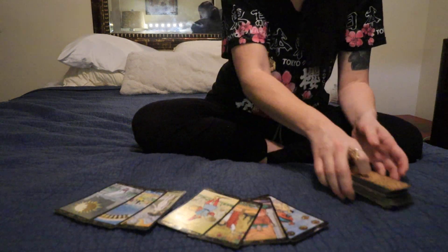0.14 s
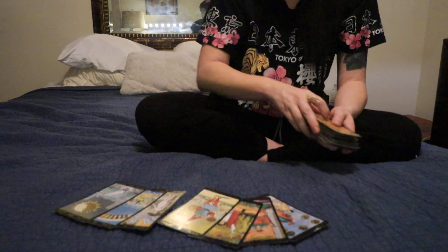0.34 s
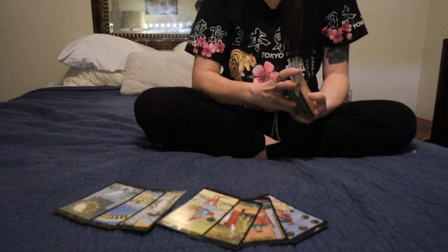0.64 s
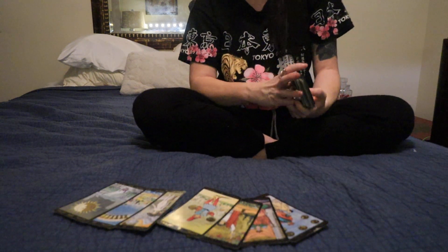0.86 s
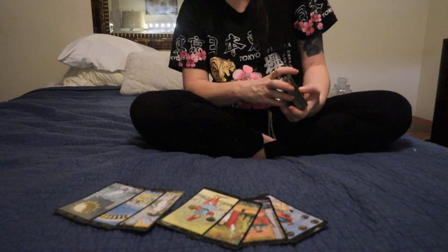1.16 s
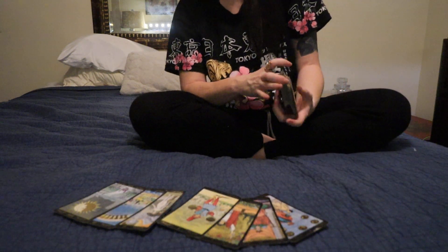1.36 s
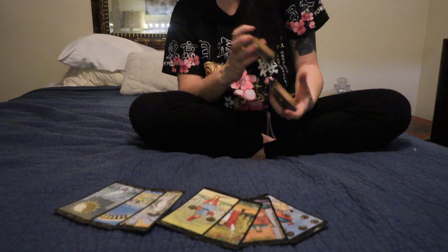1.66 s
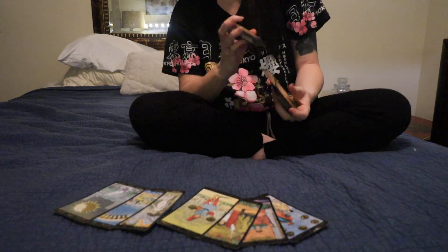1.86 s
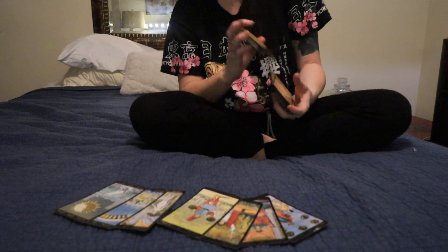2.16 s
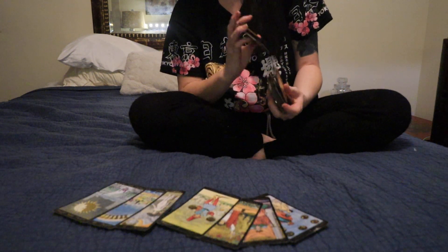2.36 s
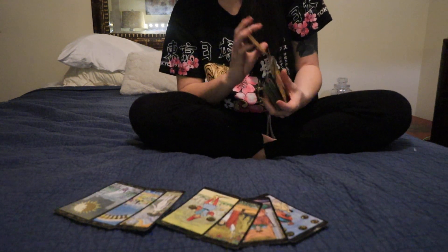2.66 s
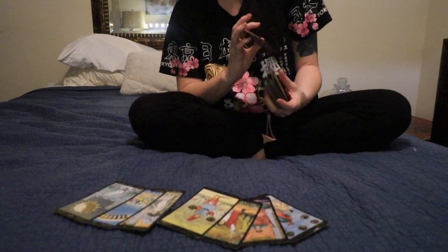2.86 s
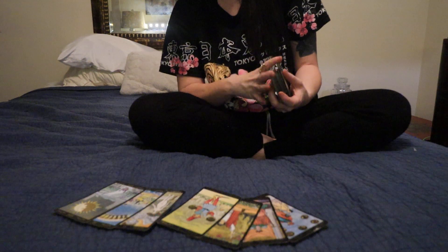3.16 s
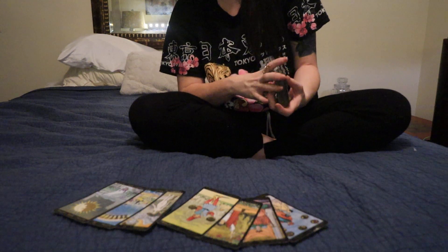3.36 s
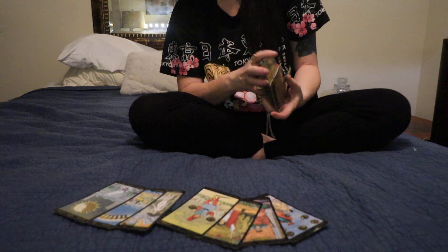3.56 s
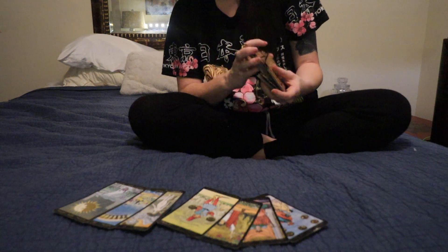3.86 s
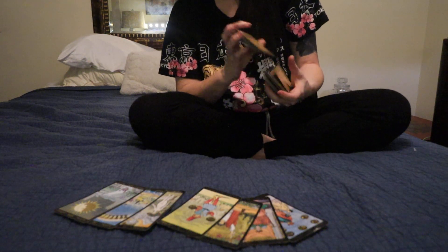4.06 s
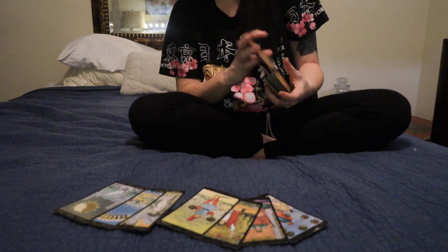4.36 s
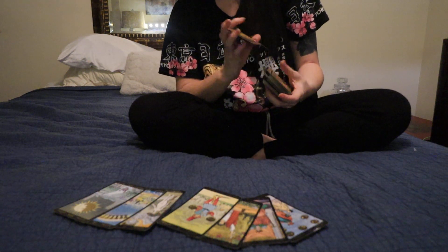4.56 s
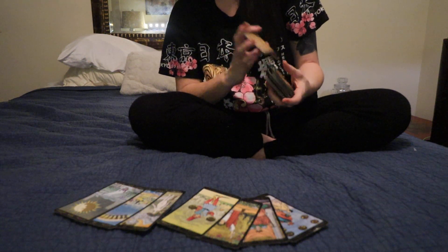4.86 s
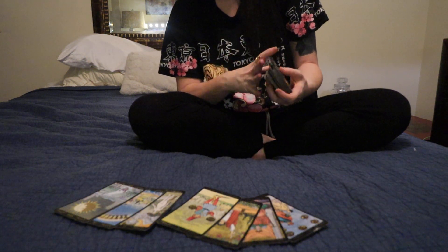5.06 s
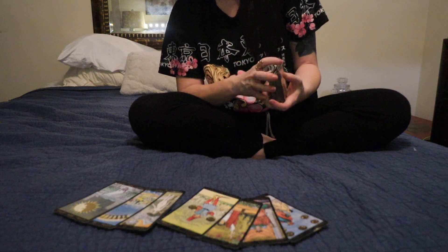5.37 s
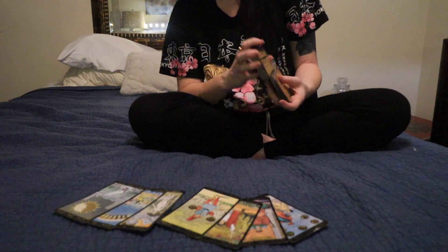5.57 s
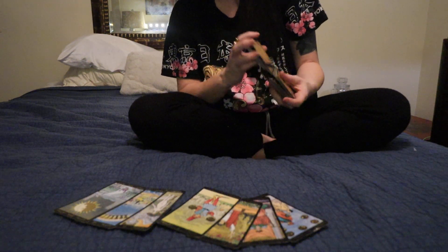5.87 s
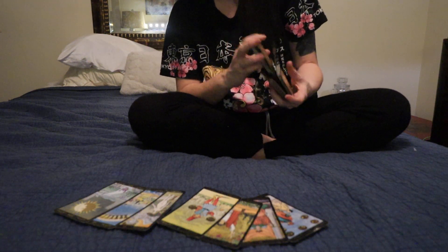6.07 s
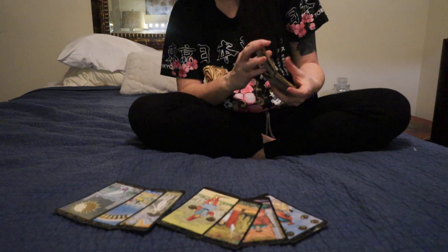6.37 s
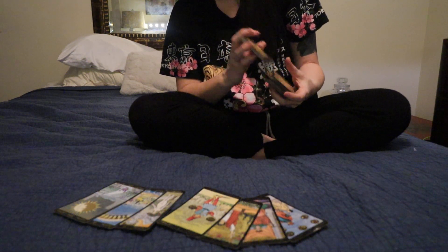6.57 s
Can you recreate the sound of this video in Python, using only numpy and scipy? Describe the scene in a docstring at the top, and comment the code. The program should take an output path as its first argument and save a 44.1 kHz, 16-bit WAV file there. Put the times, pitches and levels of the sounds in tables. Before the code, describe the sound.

In a small bedroom, over faint low mains hum, soft hiss and ventilation, a deck of cards is handled and shuffled. From 0 to 0.8 s, light uneven ticks and papery scrapes accompany picking up the pack, with one sharper click near 0.24 s and soft lumpy mattress thumps until about 0.55 s. It is nearly quiet until 1.5 s. At 1.56 s a crisp slap starts the shuffle; dense snaps and slides follow from 1.8 to 3.1 s, strongest near 2.05 s. After a lull, clicks resume at 3.65 s and run to 5.1 s, with bright cracks near 4.47, 4.72 and 5.0 s. Another gap, then from 5.7 s quick slaps and rubbing build to the loudest snaps at 6.43 and 6.69 s. Faint dull palm pats underlie some hits. Short room decay with slight wall flutter; both channels alike.

```python
"""Overhand card shuffle in a bedroom

Packets of cards snap and slap onto the pack: short noise rattles through four groups of resonances.
Faces slide on faces and edges scrape and tick: coloured noise swelling and fading with each stroke.
The pack lands in the palm with damped low sines; the mattress gives lumpy low noise early on.
A small room answers contacts and slides with decaying noise, over mains hum, hiss and ventilation.
The two channels are alike."""
import sys
import numpy as np
from scipy import signal
from scipy.fft import rfft, irfft, next_fast_len
from scipy.io import wavfile
from scipy.ndimage import uniform_filter1d, map_coordinates

SR = 44100
rng = np.random.default_rng(int(sys.argv[2]) if len(sys.argv) > 2 else 0)


def wav_record(signal):
    """Record a signal, one row per channel, as 16-bit PCM in the file named by sys.argv[1]."""
    frames = np.transpose(np.atleast_2d(signal))
    bounded = np.clip(frames, -1, 1)
    # unit amplitude maps onto the largest positive 16-bit level
    quanta = np.round(bounded * 32767).astype(np.int16)
    wavfile.write(sys.argv[1], SR, quanta)


N = 296352

# Card contacts. Each row: start in seconds, base level in dB, hollow slap over it in dB,
# tilt in dB (edge up and flap down by this much), corner snap over the base in dB,
# rattle duration in seconds, own ring in Hz, own ring level in dB.
CONTACTS = [(0.036, -29, 0, 4.5, 1, 0.0032, 593, 4), (0.063, -35, 11, 7, -5, 0.0025, 1350, 7),
            (0.099, -31.0, 5.5, -2.5, -9, 0.0016, 1080, 14.5), (0.168, -28, 9, 4, -5, 0.002, 1260, 11),
            (0.198, -28, 6, 9, -1.0, 0.0041, 1200, 13), (0.209, -32, 10, 2, -4.0, 0.0074, 1400, 8),
            (0.243, -13.5, -6.5, 1.5, -3.5, 0.0005, 834, 13.5), (0.266, -33, 3, -8, -11, 0.0023, 1430, 6),
            (0.2792, -28.5, 8, 5, -3, 0.0048, 2800, 13), (0.373, -38, 7, 8, -7, 0.0047, 980, 1),
            (0.393, -21, -7, 7.5, -9, 0.0078, 1020, 12), (0.443, -36, -11.5, 1.5, 6, 0.0034, 1750, 13),
            (0.47, -21.5, -24, 1.5, -4, 0.014, 2020, 7), (0.487, -29, -15, -4, -2, 0.004, 2500, 6),
            (0.5106, -36, 1, -7, -5, 0.005, 300, 3), (0.54, -37, 8, -6, -8, 0.0019, 300, 3),
            (0.576, -39, 7, 5, -4, 0.0019, 6590, 11), (0.6015, -30, -4.5, 4.5, 3.5, 0.0035, 2870, 7),
            (0.685, -37.5, -8, 12.5, -4, 0.0055, 7400, 5), (0.725, -26.5, -16, 3.5, -1, 0.0064, 870, 9),
            (0.782, -36, 6.5, -1, 1.5, 0.003, 6410, 6), (0.793, -39.5, 14.5, 4, 6, 0.0046, 6410, 8),
            (1.029, -35, -4, 2, -1, 0.0028, 640, 9), (1.512, -35.5, -4, 3, -4, 0.002, 1750, 5),
            (1.562, -12.5, 2.5, -1.5, 6, 0.0019, 690, 4.0), (1.574, -18, -4, 0, -14, 0.004, 2020, 5.0),
            (1.795, -14.0, -2, 0.5, 1, 0.0063, 1630, 12.5), (1.828, -16, -8.0, -1.5, -3.0, 0.0077, 390, 10),
            (1.886, -14.5, -3, -1.5, -3, 0.0056, 1090, 9), (1.895, -15.5, -0.5, 0.5, -3, 0.0028, 6800, 1),
            (2.05, -8, 0.5, 2.5, -4.5, 0.0054, 1080, 6.0), (2.152, -23, -25, 8, -4, 0.016, 1560, 14),
            (2.169, -13.0, 5.0, 1.5, -2.5, 0.0058, 1440, 8), (2.302, -27, 2, 2.5, -10, 0.0056, 1350, 9),
            (2.352, -30.5, 3, 1, -1, 0.004, 5230, 7), (2.3884, -28.5, -5, 8.5, 2.5, 0.0037, 2640, 17),
            (2.496, -27.5, -8, -1.5, -1, 0.0032, 6050, 4), (2.554, -24, -5.5, 3, 4, 0.0076, 870, 12),
            (2.5653, -16.0, -18, 4, 4, 0.0062, 6590, -1), (2.6124, -22.5, 0, 0, 4.5, 0.0064, 1060, 7.5),
            (2.8034, -18, 1, 1.5, 4.5, 0.0021, 1600, 8.0), (2.878, -33, 1, 0, -3.5, 0.0037, 555, 11),
            (2.885, -24, -11.0, -1.5, -5, 0.0032, 1310, 1.0), (2.927, -31.5, 5.5, -8, 3, 0.0059, 1020, 12),
            (3.028, -21, -1.5, 6, -0.5, 0.018, 2150, 19), (3.057, -28, -11, 5, 10, 0.0055, 6550, 6),
            (3.655, -31, -1, -8.5, 6, 0.0019, 2660, 4), (3.7, -21.5, 8, 3.5, -5, 0.0098, 1330, 9.5),
            (3.722, -30, -18.5, 1.0, 9, 0.0013, 1310, 1), (3.9055, -28.5, 3.5, 6.5, -4, 0.0028, 2400, 8.0),
            (3.9184, -19, -7, 0.5, -5, 0.011, 690, 2), (3.9497, -18.5, -1, 1, -1, 0.0044, 1190, 3),
            (4.016, -21, -15.0, 0, -7, 0.0068, 1560, 11.5), (4.0384, -23, 6, -3.0, -4.5, 0.0078, 1040, 6),
            (4.093, -38, -8, 14.5, 0.0, 0.0021, 1200, 11), (4.177, -19.5, -5, -1.5, -4.5, 0.0046, 3700, 0),
            (4.2456, -24.5, -3, 1, -7, 0.0049, 368, -1), (4.336, -19.5, -18, -1, -4, 0.003, 3260, -7),
            (4.345, -18, -5.5, 0.5, -4, 0.0033, 440, 5.5), (4.4522, -15, -11, 1.5, -4, 0.0033, 2080, 8.0),
            (4.473, -9, -16, 1, 6, 0.0018, 8480, 19), (4.716, -10.5, -6, 2.5, -2, 0.0013, 1080, 2),
            (4.759, -18.5, -4, 0.5, -4, 0.0068, 450, 4), (4.825, -26, -19.5, 3, -3.5, 0.0032, 1230, -2),
            (4.8463, -26.5, 6, -5.5, 5.5, 0.0073, 2140, 3),
            (4.9866, -19.5, -0.5, 0.5, -2.0, 0.0038, 3810, 6.0),
            (4.9908, -16, -5, 1.5, -3, 0.0097, 5300, 11), (5.0098, -11.5, 1, 6, 5.5, 0.0012, 1730, 3),
            (5.051, -25.5, 3, 3, 3, 0.005, 480, 1.5), (5.0984, -29, 4.5, 3, 11.5, 0.013, 1190, 11.0),
            (5.686, -22, 2, 4.5, -6, 0.0038, 4420, -3), (5.715, -26.5, -11, 10, 4, 0.0035, 1510, 17),
            (5.727, -33.5, 20.5, -1, -3.5, 0.002, 1270, 21),
            (5.878, -14.5, -10, 0.5, -1.5, 0.0033, 1300, 9), (5.921, -19, -2, 0, -3, 0.0051, 1430, 15),
            (5.9342, -22.5, 4.5, 6.5, 3.5, 0.0041, 2140, 10.0),
            (5.942, -20.5, -7.5, 4.5, 0.5, 0.0023, 820, 9), (5.948, -27.5, 5, -14.5, -8.0, 0.0013, 3560, 8),
            (6.016, -24, 4.5, 2, -6, 0.0042, 2120, 11.5), (6.128, -22.5, -9, -0.5, -4, 0.0017, 2140, 5),
            (6.141, -25, -3, 0, 4.5, 0.0017, 2620, 0), (6.156, -16.5, -8, 0, -4, 0.011, 2170, 7),
            (6.1694, -23.5, -4.0, -14.5, -1.0, 0.004, 1553, 3), (6.2, -24, 6, 4.5, 2, 0.0028, 734, 4.0),
            (6.294, -20, -6, 1.5, -6, 0.01, 950, 14), (6.3354, -33, 11, 8, 0.5, 0.0016, 410, -1),
            (6.424, -14, -13, -2, -2, 0.0024, 730, 10), (6.432, -5.5, -14, -0.5, -6, 0.0037, 2330, 10),
            (6.4393, -4.5, -12, -1, 3.5, 0.0046, 1540, 8.5), (6.511, -12.0, -9, -1, 1.5, 0.0028, 2600, 8),
            (6.522, -12.5, 3, -1, 2, 0.0013, 7200, 7), (6.662, -36, 1, 3.0, 1.5, 0.0023, 3920, 4),
            (6.686, 0.5, -12.5, 0, 3.5, 0.0015, 3050, 8.5)]
# Resonances, before their skirts are steepened. Each row: centre in Hz, width in Hz, level in dB.
HOLLOW_MODES = [(356, 514, 8.5), (468, 98, -7), (690, 800, 3)]  # air squeezed between packets
FLAP_MODES = [(1254, 1460, 0), (1706, 1540, -5.3), (2346, 1600, -1.5)]  # cards bending
SNAP_MODES = [(3120, 1350, -5.5), (3904, 2800, 7), (5110, 2100, -1)]  # stiff card corners
EDGE_MODES = [(6370, 2800, 12), (7040, 1900, 0), (8280, 2300, 4), (11000, 7600, 8)]  # edges catching
# Two bare walls. Values: round trip in seconds, gain per trip in dB, band centre in Hz,
# band width in Hz, flutter level in dB before the first trip's loss.
FLUTTER = (.0135, -3, 1300, 350, -6)
# Room decay. Each row: frequency in Hz, time to fall 60 dB in seconds.
ROOM_T60_S = [(200, 0.22), (950, 0.21), (1300, 0.35), (1750, 0.26), (4000, 0.24), (8000, 0.21),
              (14000, 0.17)]
# Bedding absorbs some of the room's answer to contacts. Each row: frequency in Hz, gain in dB.
SOFT_DB = [(300, -4.5), (8800, -1.5), (10000, -5.5), (16000, -7)]
# Pack landing in the palm. Each row: start in seconds, level in dB before the soft onset.
THUDS = [(1.562, -49.5), (1.796, -45), (1.884, -41), (3.699, -41), (4.037, -48), (4.715, -47), (5.726, -52),
         (6.197, -47), (6.521, -39.5)]
# Packets and fingers sliding over the deck. Each row: middle in seconds, length in seconds,
# hiss of faces in dB, scrape of edges in dB.
STROKES = [(0.055, 0.18, -56, -58), (0.195, 0.15, -48, -44), (0.408, 0.069, -44.5, -48),
           (.47, 0.074, -46.5, -56), (0.613, 0.12, -58, -61), (0.748, 0.17, -53, -57), (1.0, .06, -52, -63),
           (1.405, 0.18, -62, -71.5), (1.567, 0.12, -52, -63), (1.906, 0.11, -43.5, -43.5),
           (2.122, 0.14, -48.5, -50.5), (2.378, 0.15, -49, -57), (2.634, 0.19, -50, -60),
           (2.855, 0.15, -53, -55.5), (3.086, 0.085, -44.5, -50.5), (3.33, 0.076, -61, -70),
           (3.576, 0.13, -57, -70), (3.695, 0.069, -53, -70), (3.844, 0.058, -62, -81),
           (3.958, 0.071, -46, -57), (4.044, 0.12, -54, -52), (4.205, 0.037, -43, -47),
           (4.294, 0.15, -50, -63.5), (4.531, 0.12, -44, -47.5), (4.805, 0.1, -51, -58),
           (5.08, .14, -54, -62), (5.451, 0.065, -56, -70), (5.632, 0.066, -55, -64),
           (5.708, 0.064, -41, -55), (5.97, 0.084, -53, -50), (6.05, 0.084, -52, -52),
           (6.26, 0.17, -46.5, -53.5), (6.53, 0.21, -55, -50.5)]
# Hands merely holding the deck. Values: hiss in dB, scrape in dB.
HOLD_DB = (-66, -66)
# Noise spectra, shape only. Each row: frequency in Hz, density in dB per Hz.
FACES_SPECTRUM_DB = [(880, -15), (1500, -19), (2060, -26), (3150, -1.5), (3660, 0.5), (7540, 3), (9750, -6),
                     (11900, -5.5), (16000, -21)]
SCRAPE_SPECTRUM_DB = [(120, -41), (200, -7), (867, 3.5), (1620, 2), (2300, -0.5), (2550, -0.5), (4000, -9),
                      (5200, -2), (8800, -120)]
THUMP_SPECTRUM_DB = [(29, -43), (50, -13), (129, 2.5), (353, -11), (445, -12), (700, -22), (910, -43),
                     (1540, -120)]
HISS_SPECTRUM_DB = [(15, -46), (25, -13), (64, -2.5), (127, -5), (149, -8.5), (236, -8), (363, -11),
                    (394, -9.5), (439, -11), (607, -8.5), (911, -23), (3620, -17), (16000, -28.5)]
# Soft bumps of the bed. Each row: middle in seconds, level in dB.
BUMPS = [(.03, -57), (.09, -49), (.118, -43), (.17, -50), (.205, -46), (.25, -45), (.285, -49), (.325, -52),
         (.515, -58), (.545, -51)]
# Weight leaning on the mattress. Values: middle in seconds, length in seconds, level in dB.
LEAN = (0.18, 0.28, -51)
# Mains hum. Each row: frequency in Hz, level in dB rms about which it wavers.
HUM = [(59.8, -66), (119.6, -70.5), (179.4, -73.5), (239.2, -79)]

TAIL_SAMPLES, LEAD_SAMPLES = 16384, 256  # room answer; margin ahead of each contact
CONTACT_ROOM_DB, SLIDE_ROOM_DB = 1.5, -11.0  # the room's answer
PALM_HZ, PALM_T60_S, PALM_ONSET_S = 166, 0.11, 0.003
TICKS_PER_S, TICK_DB, TICK_SPREAD_DB = 40, 9, 3  # mean rate; level over the slide's hiss
TICK_T60_S = 0.0026
BUMP_S = 0.031
HUM_WAVER_DB, HISS_DB = 2.5, -57
TOP_HZ = 15900


def amp(db):
    """Amplitude of a level in dB."""
    return 10 ** (np.asarray(db) / 20)


def unit(x):
    """x over the root of its mean square."""
    return x / np.sqrt(np.mean(x ** 2) + 1e-20)


def along(points, hz):
    """(Hz, value) points interpolated on a log frequency axis."""
    f, v = np.transpose(points)
    return np.interp(np.log(hz + 1), np.log(f + 1), v)


def wobble(knots_per_s):
    """A smooth random curve through normally distributed knots."""
    knots = rng.standard_normal(int(N * knots_per_s / SR) + 4)
    return map_coordinates(knots, [np.arange(N) * knots_per_s / SR])


def swell(t, middle_s, length_s):
    """A bell-shaped rise and fall, 1/e at both ends of its length."""
    return np.exp(-(2 * (t - middle_s) / length_s) ** 2)


def filtered(x, response):
    """x shaped by a response of frequency."""
    m = next_fast_len(N + 8192)
    return irfft(rfft(x, m) * response(np.fft.rfftfreq(m, 1 / SR)), m)[..., :N]


def grit(spectrum_db, grain_db, knots_per_s):
    """Coloured noise of rms 1 whose level fluctuates at random, as in rubbing."""
    noise = amp(grain_db * wobble(knots_per_s)) * rng.standard_normal(N)
    return unit(filtered(noise, lambda hz: amp(along(spectrum_db, hz))))


def tails(count):
    """Room answers of energy 1: silent until the first wall, each frequency dying at its own speed."""
    noise = rng.standard_normal((count, TAIL_SAMPLES))
    hz, t, z = signal.stft(noise, SR, nperseg=256)
    z = z * amp(-60 * t / along(ROOM_T60_S, hz)[:, None])
    tail = signal.istft(z, SR, nperseg=256)[1][:, :TAIL_SAMPLES]
    t = np.arange(TAIL_SAMPLES) / SR
    tail = tail * np.clip((t - 0.004) / 0.0009, 0, 1)
    # early echoes arrive in lumps
    knots = rng.standard_normal((count, TAIL_SAMPLES // 128))
    lumps = uniform_filter1d(np.repeat(knots, 128, axis=1), size=64, axis=1)
    tail = tail * amp(1.26 * lumps * np.exp(-t / 0.07))
    return tail / np.linalg.norm(tail, axis=1, keepdims=True)


def resonance(f, centre_hz, width_hz):
    """Complex band-pass response, 1 at its centre."""
    damping = 1j * f * width_hz
    return damping / (centre_hz ** 2 - f * f + damping)


def contact_colour(f, levels_db, own_hz, own_db):
    """Four groups of card resonances, one own ring per contact, and random peaks and dips."""
    colour = 0
    for modes, db in zip((HOLLOW_MODES, FLAP_MODES, SNAP_MODES, EDGE_MODES), levels_db):
        ring = sum(amp(gain_db) * resonance(f, hz, width_hz) for hz, width_hz, gain_db in modes)
        ring = ring * np.abs(ring) ** 2.7  # steeper skirts keep the groups apart
        colour = colour + amp(db) * unit(ring)
    # packet thickness sets one ring of its own
    colour = colour * (1 + (amp(own_db) - 1) * resonance(f, own_hz, 0.063 * own_hz + 120))
    # random peaks and dips in each contact's colour, closer together in the bass
    knots = rng.standard_normal((len(own_hz), 40))
    place = np.sqrt(f / f[-1]) * 39
    ripple = [np.interp(place, np.arange(40), row) for row in knots]
    return colour * amp(2.5 * np.array(ripple))


def wall_flutter(f):
    """One band bounces between two walls, a little weaker each trip; added to the direct sound."""
    trip_s, trip_db, centre_hz, width_hz, flutter_db = FLUTTER
    bounce = amp(trip_db) * np.exp(-2j * np.pi * f * trip_s)
    band = np.exp(-((f - centre_hz) / width_hz) ** 2)
    return 1 + amp(flutter_db) * band * bounce / (1 - bounce)


def contacts():
    """Each contact is a short rattle through card resonances; walls echo it and the room smears it."""
    columns = np.transpose(CONTACTS)[:, :, None]
    start_s, base_db, slap_db, tilt_db, snap_db, duration_s, own_hz, own_db = columns
    levels_db = base_db + slap_db, base_db - tilt_db, base_db + snap_db, base_db + tilt_db
    count, size = len(start_s), 2 * TAIL_SAMPLES
    t = np.maximum(np.arange(TAIL_SAMPLES) - LEAD_SAMPLES, 0) / SR
    f = np.fft.rfftfreq(size, 1 / SR)
    u = t / (0.5 * np.maximum(duration_s, 0.0005))
    push = rfft(rng.standard_normal((count, TAIL_SAMPLES)) * u ** 0.5 * np.exp(-u), size)
    # level the spectrum: a broadband push
    push = push / np.sqrt(uniform_filter1d(np.abs(push) ** 2, size=500, axis=1))
    colour = contact_colour(f, levels_db, own_hz, own_db)
    direct = push * wall_flutter(f)
    # the answer takes the colour, not the rattle or flutter
    answer = rfft(np.roll(tails(count), LEAD_SAMPLES, axis=1), size)
    answer = amp(CONTACT_ROOM_DB) * amp(along(SOFT_DB, f)) * answer
    heard = irfft(colour * (direct + answer))
    out = np.zeros(N + size)
    starts = np.round(start_s[:, 0] * SR).astype(int) - LEAD_SAMPLES
    for start, contact in zip(starts, heard):
        out[start:start + size] += contact
    return out[:N]


def thuds():
    """The pack lands in the palm: a soft, quickly damped low push."""
    out, t = np.zeros(N + SR), np.arange(SR // 5) / SR
    push = (1 - np.exp(-t / PALM_ONSET_S)) * np.sin(2 * np.pi * PALM_HZ * t)
    for start_s, db in THUDS:
        out[round(start_s * SR):][:len(t)] += amp(db - 60 * t / PALM_T60_S) * push
    return out[:N]


def slides():
    """Faces hiss, edges scrape and tick in each stroke, which swells and fades; the room smooths all."""
    t = np.arange(N) / SR
    face, scrape = amp(HOLD_DB)[:, None] + sum(
        amp(db)[:, None] * swell(t, middle_s, length_s) for middle_s, length_s, *db in STROKES)
    uneven = amp(0.18 * wobble(22))
    # card edges catching at random
    caught = rng.random(N) < TICKS_PER_S / SR
    caught = caught * amp(TICK_DB + TICK_SPREAD_DB * rng.standard_normal(N))
    decay = amp(-60 * t[:SR // 100] / TICK_T60_S)
    ticks = np.convolve(caught, decay)[:N]
    ticks = ticks * grit(FACES_SPECTRUM_DB, grain_db=1.5, knots_per_s=500)
    hiss = grit(FACES_SPECTRUM_DB, grain_db=1.0, knots_per_s=580)
    rasp = grit(SCRAPE_SPECTRUM_DB, grain_db=2.5, knots_per_s=220)
    near = uneven * (face * (hiss + ticks) + scrape * rasp)
    return near + amp(SLIDE_ROOM_DB) * signal.fftconvolve(near, tails(count=1)[0])[:N]


def bedding():
    """Lumpy low thumps of the mattress and cover as the weight shifts."""
    t = np.arange(N) / SR
    level = sum(amp(db) * swell(t, middle_s, BUMP_S) for middle_s, db in BUMPS)
    lean_middle_s, lean_length_s, lean_db = LEAN
    level = level + amp(lean_db) * swell(t, lean_middle_s, lean_length_s)
    return level * grit(THUMP_SPECTRUM_DB, grain_db=3.5, knots_per_s=35.5)


def background():
    """Mains hum wavering in level and phase, over gently fluctuating hiss and ventilation."""
    t = np.arange(N) / SR
    hum = 0
    for hz, rms_db in HUM:
        level = np.sqrt(2) * amp(rms_db + HUM_WAVER_DB * wobble(4))
        hum = hum + level * np.sin(2 * np.pi * hz * t + 0.7 * wobble(5))
    return hum + amp(HISS_DB) * grit(HISS_SPECTRUM_DB, grain_db=2.0, knots_per_s=9.1)


def scene():
    """All sources summed, the same in both channels."""
    mono = contacts() + thuds() + slides() + bedding() + background()
    return np.array([mono, mono])


def record(dry):
    """Nothing is kept at or above the band limit."""
    return filtered(dry, lambda hz: hz < TOP_HZ)


dry = scene()
out = record(dry)
wav_record(out)
```